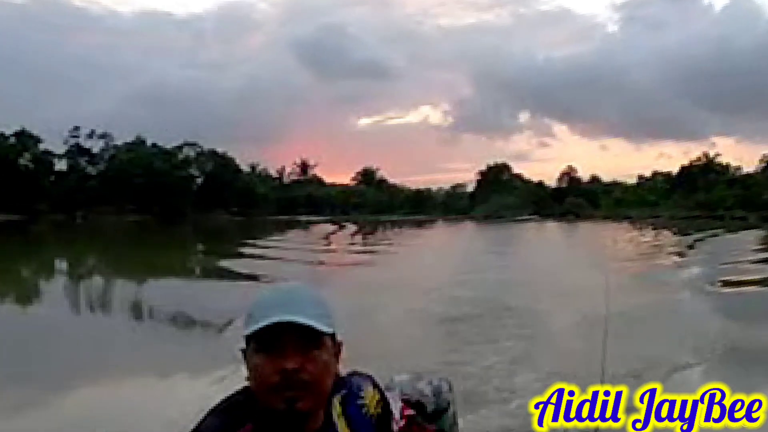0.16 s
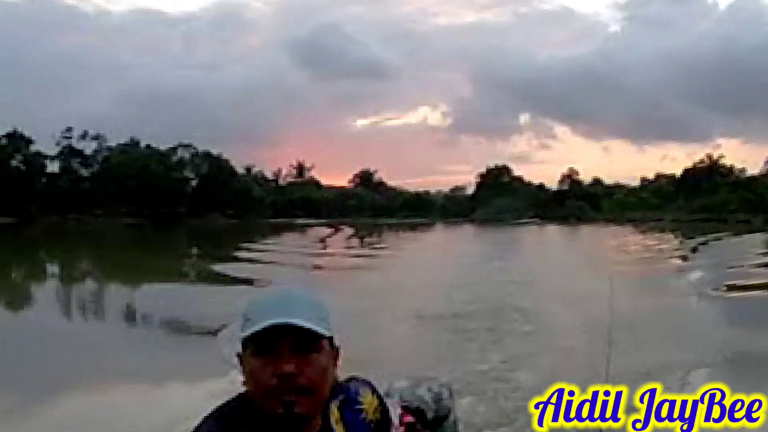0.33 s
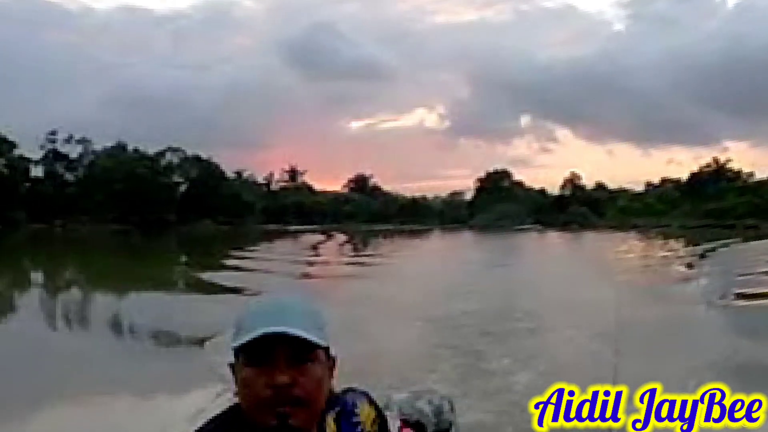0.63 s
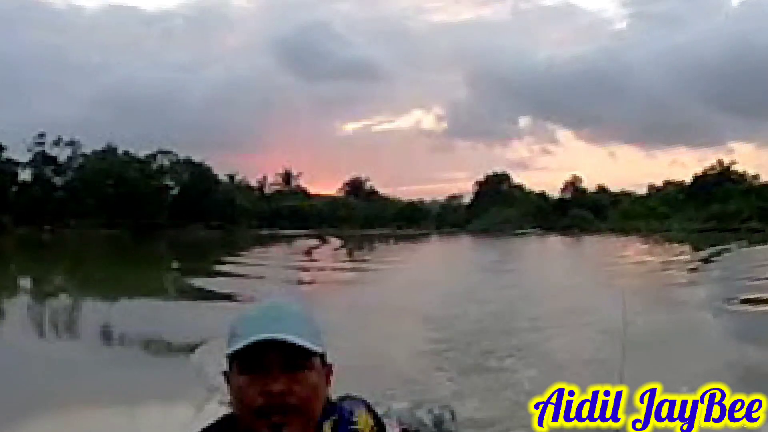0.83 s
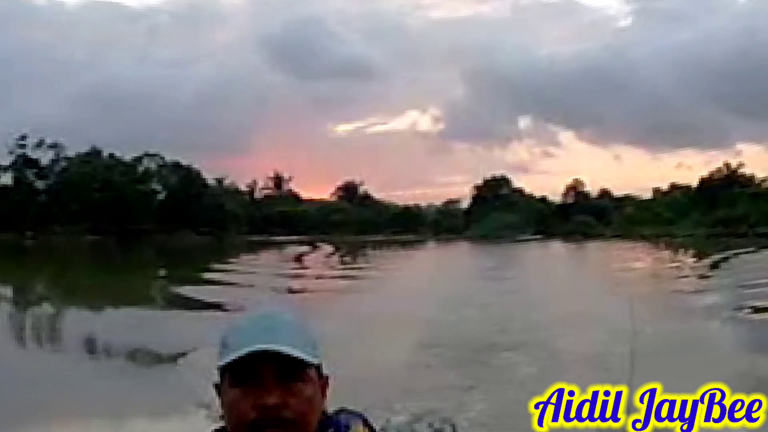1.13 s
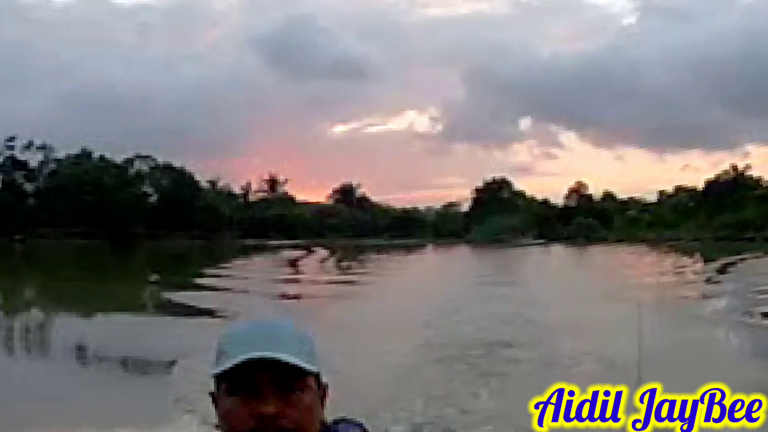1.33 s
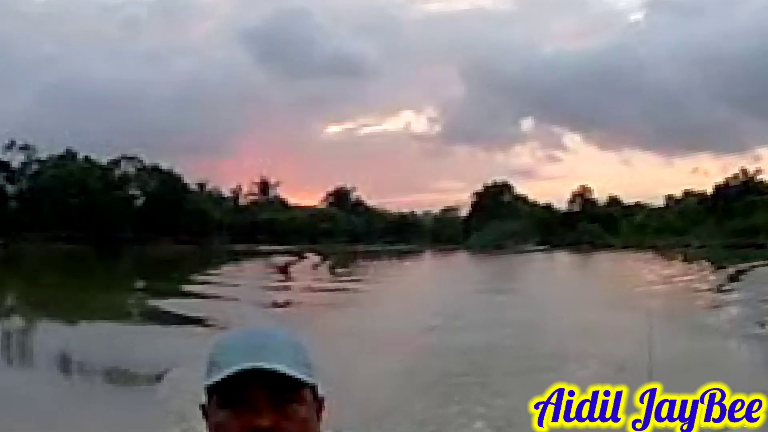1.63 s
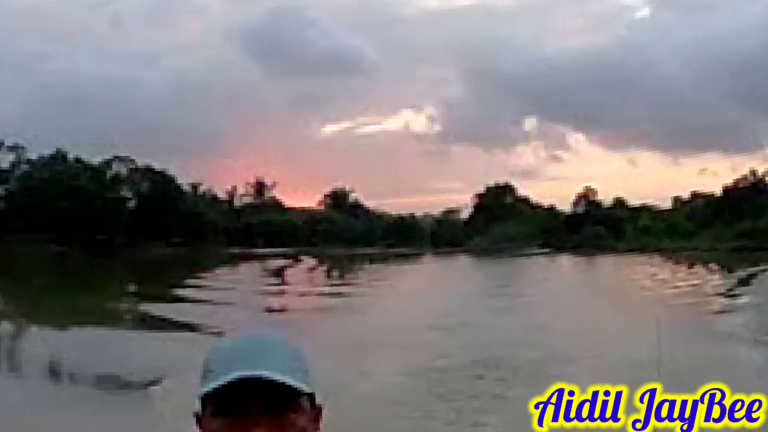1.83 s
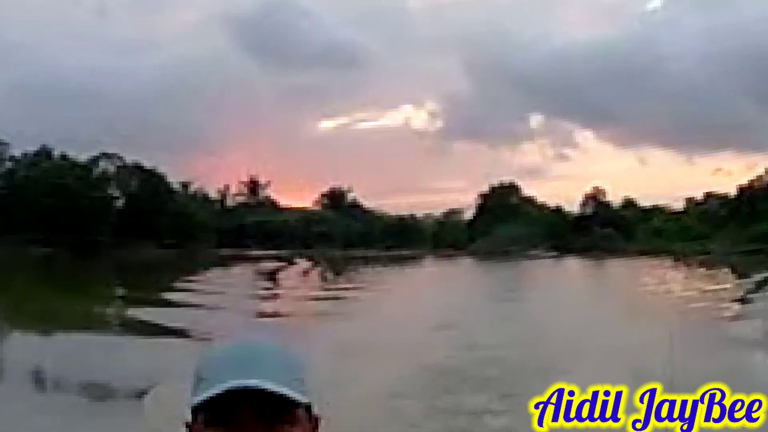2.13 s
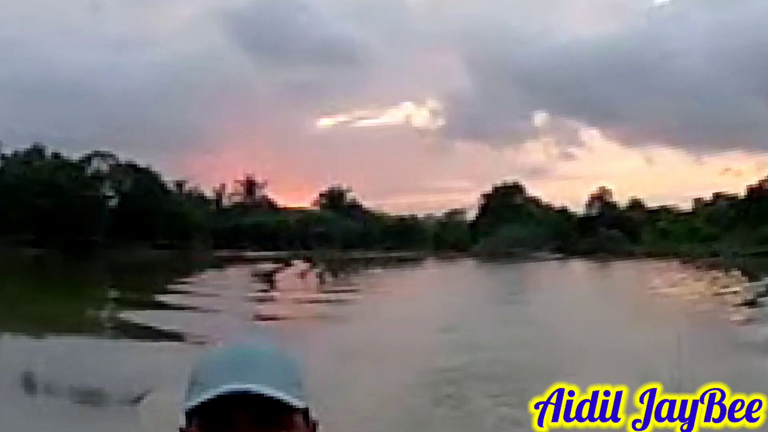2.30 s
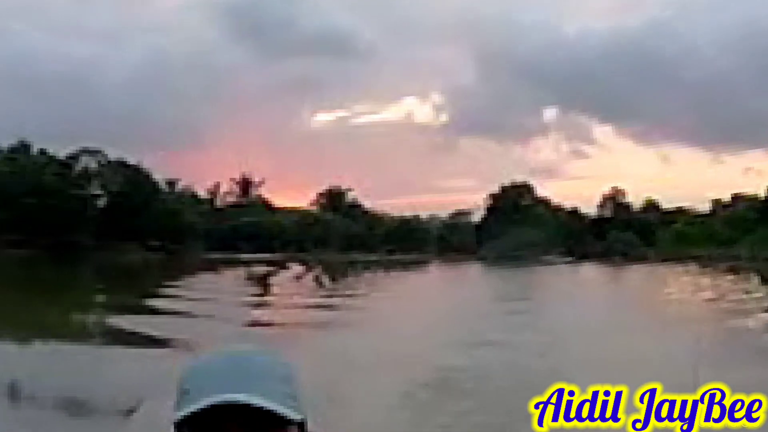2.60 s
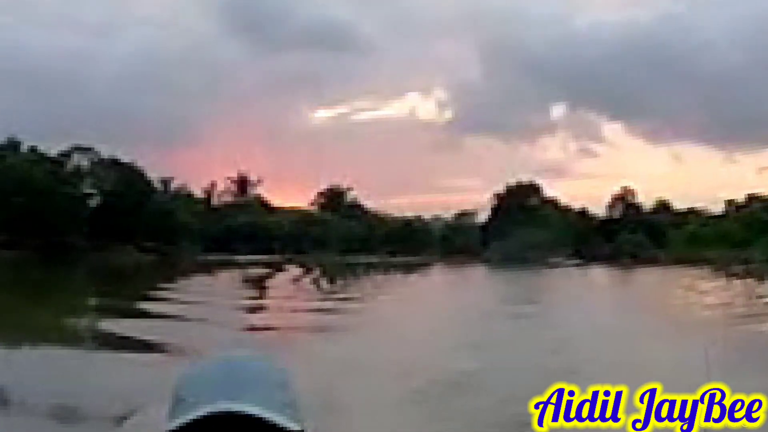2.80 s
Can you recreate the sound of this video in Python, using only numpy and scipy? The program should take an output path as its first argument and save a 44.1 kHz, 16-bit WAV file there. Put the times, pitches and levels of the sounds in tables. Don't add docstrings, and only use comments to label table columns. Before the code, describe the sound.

Steady buzzing hum of a small boat motor with fizzing spray, ending in heavy hull knocks

```python
import sys
import numpy as np
from scipy import signal
from scipy.fft import rfft, irfft, next_fast_len
from scipy.io import wavfile
from scipy.ndimage import uniform_filter1d, map_coordinates

SR = 44100
rng = np.random.default_rng(int(sys.argv[2]) if len(sys.argv) > 2 else 0)


def int16_out(signal):
    q = np.round(np.clip(np.atleast_2d(signal).T, -1, 1) * 32767)
    wavfile.write(sys.argv[1], SR, q.astype(np.int16))


def attenuation_scalar(level_db):
    decades = np.asarray(level_db, float) / 20
    return 10 ** decades


N = 130095

# f/Hz, level/dB
RUMBLE_COLOUR = [(30, -4), (60, -14.5), (85, -16.5), (160, 0.5), (300, -7.5), (400, -10), (650, -7.5),
                 (1100, -42.5)]
# t/s, level/dB
WAVE_CHURN = [
    (2.69, -60),
    (2.73, -31),
    (2.8, -27),
    (2.86, -32),
    (2.89, -25),
    (2.95, -21),
]
# f/Hz, level/dB
CHURN_COLOUR = [(25, -16), (60, -4), (130, 6), (250, -2), (400, -3), (600, -10), (900, -33)]
# t/s, level/dB, pitch f/Hz, time to fall 60
# dB t60/s
HULL_SLAPS = [(.11, -29, 775, 0.16), (.175, -33, 845, 0.19), (.62, -20, 130, 0.062),
              (1.255, -25.5, 377.4, 0.19), (2.70, -27, 799.6, 0.065), (2.727, -1, 155, 0.031),
              (2.752, -14, 110, 0.056), (2.762, -9.5, 288, 0.031), (2.791, -10, 202.6, 0.057),
              (2.805, -19, 236, 0.034), (2.879, -17, 140.3, 0.043), (2.893, -5.5, 139.6, 0.045),
              (2.9, -10.5, 338, 0.045), (2.913, -10, 150, 0.0548), (2.931, -6.5, 161, 0.036),
              (2.939, -7, 270, 0.028), (2.9456, -3.5, 389, 0.028)]
# t/s, level/dB
SPRAY_LEVEL = [(0.0, -41), (0.01, -42), (0.06, -36.5), (0.15, -40), (0.65, -40.5), (0.72, -36.5),
               (0.91, -41), (1.08, -37.5), (1.08, -40), (2.48, -39.5), (2.53, -38), (2.95, -38.5)]
# f/Hz, level/dB
FIZZ_COLOUR = [(4000, -7.5), (5400, -6), (6500, 0), (8000, -7), (9100, -4.5), (11000, -16.5), (13700, -29),
               (15000, -16)]
# f/Hz, level/dB
MIST_COLOUR = [(10500, -20), (12000, -8), (13700, -8), (15000, -4)]
# t/s, peak level/dB
SPLASHES = [(0.0656, -23), (0.5406, -20), (0.711, -32), (1.065, -21), (1.4541, -20), (1.8495, -31),
            (2.1303, -22), (2.5641, -13.5), (2.6327, -19), (2.7152, -25), (2.7312, -15), (2.9297, -21)]
# f/Hz, level/dB
SPLASH_COLOUR = [(4500, -11), (6500, -4), (9500, -2), (11500, -12), (13500, -19), (15000, -8)]
# t/s, gear whine f/Hz, whine level/dB, hum level over its mean/dB
ENGINE = [(0.0, 598, -40, -5), (0.02, 595.5, -28, 4), (0.04, 599.0, -40, -1.5), (0.06, 602.5, -30.5, 0.5),
          (0.48, 605, -27, -1.5), (0.61, 604.4, -31, 0), (1.0, 600.8, -24.5, -1), (1.02, 607.3, -29.5, -1),
          (1.12, 604.2, -27.5, 0), (1.87, 602.7, -29.5, 0), (2.14, 607, -25.5, 0), (2.15, 607, -28.5, 0),
          (2.95, 596.8, -26, 0.5)]
HUM_ORDERS = [2, 3, 4, 5, 6, 7, 8, 8.5, 9, 10, 12, 16, 18, 19, 20]
HUM_LEVELS = [-1.5, -23, 1, -10, -25, -31, -12.5, -22.5, -18, -26, -20, -23.5, -25.5, -29.5, -31]
WHINE_ORDERS = [12.5, 13, 13.5, 26, 28, 37, 39, 40.5, 41, 43, 52, 88, 98]
WHINE_LEVELS = [-16, 0, -20.5, -25.5, -28, -28.5, -24.5, -21.5, -33.5, -29.5, -32, -32, -30]
# f/Hz, level/dB
CASING_COLOUR = [(500, -42), (750, 0), (1100, -3), (1400, -4.5), (1900, -5.5), (2400, -10), (3500, -12.5),
                 (5200, -13.5)]


def unit(x):
    return x / np.sqrt(np.mean(x ** 2) + 1e-20)


def curves(rows):
    times, *columns = np.transpose(rows)
    return [np.interp(np.arange(N) / SR, times, column) for column in columns]


def wobble(rate):
    return map_coordinates(rng.standard_normal(400), [np.arange(N) * rate / SR])


def coloured(x, points):
    size = next_fast_len(N + 8192)
    f, db = np.transpose(points)
    log_f = np.log(f)
    log_hz = np.log(np.fft.rfftfreq(size, 1 / SR) + 1)
    below = np.maximum(log_f[0] - log_hz, 0)
    above = np.maximum(log_hz - log_f[-1], 0)
    gain = attenuation_scalar(np.interp(log_hz, log_f, db) - 40 * (below + above))
    return irfft(rfft(x, size) * gain, size)[:N]


def patchy(patchy_db):
    z = signal.stft(rng.standard_normal(N), nperseg=512)[2]
    patches = uniform_filter1d(rng.standard_normal(z.shape), size=5, axis=0)
    patches = uniform_filter1d(patches, size=3, axis=1)
    return signal.istft(z * attenuation_scalar(patchy_db * unit(patches)), nperseg=512)[1][:N]


def bursts(seconds, gains, t60):
    at = np.clip((seconds * SR).astype(int), 0, N - 1)
    spikes = np.bincount(at, gains, N)
    fade = attenuation_scalar(-60 * np.arange(800) / SR / t60)
    return np.convolve(spikes, fade)[:N] * np.sign(rng.standard_normal(N))


def hull_rumble():
    return attenuation_scalar(-30.5 + 1.6 * wobble(7.61)) * unit(coloured(patchy(patchy_db=1.5), RUMBLE_COLOUR))


def wave_churn():
    level_db = curves(WAVE_CHURN)[0] + 1.8 * wobble(90)
    return attenuation_scalar(level_db) * unit(coloured(rng.standard_normal(N), CHURN_COLOUR))


def hull_slaps():
    rise_s, overtone, overtone_db = 0.0018, 2.197, -13.5
    out = np.zeros(N)
    for s, db, hz, t60 in HULL_SLAPS:
        t = np.maximum(np.arange(N) / SR - s, 0)
        strength = 1.55 * attenuation_scalar(db - 60 * t / t60) * (1 - np.exp(-t / rise_s))
        ring = np.sin(2 * np.pi * hz * t)
        ring = ring + attenuation_scalar(overtone_db) * np.sin(2 * np.pi * overtone * hz * t)
        out = out + strength * ring
    return out


def drops(per_s, mid_hz, octaves, cycles, size):
    spread_db = 2.5
    draw = rng.random((3000, 3))[:int(per_s * N / SR)]
    scatter = rng.standard_normal(3000)[:len(draw), None]
    hz = np.clip(mid_hz * 2 ** (octaves * scatter), 500, 15000)
    t = np.arange(size) / SR
    life = t * hz / cycles
    gain = attenuation_scalar(np.minimum(-spread_db * np.log(draw[:, 1:2] + 1e-6), 11))
    swell = life * np.exp(-3 * life)
    tone = np.sin(2 * np.pi * hz * t * (1 + 0.039 * life))
    grains = gain * swell * tone * np.cos(np.pi / 2 * t / t[-1])
    at = (draw[:, :1] * N).astype(int) + np.arange(size)
    return unit(np.bincount(at.ravel(), grains.ravel(), N + size)[:N])


def gurgle():
    return attenuation_scalar(-49) * drops(per_s=130, mid_hz=1399, octaves=0.7, cycles=26.8, size=1600)


def spray():
    fizz = unit(coloured(patchy(patchy_db=1.9), FIZZ_COLOUR)) * attenuation_scalar(0.7 * wobble(22))
    bubbles = drops(per_s=450, mid_hz=7416, octaves=0.67, cycles=26, size=400)
    bubbles = unit(coloured(bubbles, [(2000, -17), (3500, -10)] + FIZZ_COLOUR[1:]))
    mist = attenuation_scalar(-19 + 2.6 * wobble(14)) * unit(coloured(patchy(patchy_db=8.0), MIST_COLOUR))
    strength_db, = curves(SPRAY_LEVEL)
    return attenuation_scalar(strength_db - 1.0) * (fizz + attenuation_scalar(-12.5) * bubbles + mist)


def splashes():
    s, db = np.transpose(SPLASHES)
    lag_s = 0.001
    return coloured(bursts(s + lag_s, attenuation_scalar(db), t60=0.006), SPLASH_COLOUR)


def orders(turns, multiples, levels_db):
    out = np.zeros(N)
    for k, db in zip(multiples, levels_db):
        lean = 0.41
        if k > 5:
            lean += 0.5
        if k > 8:
            lean += rng.random()
        shake_db = (1.27 - 0.1384 * db) * 1.17 * np.tanh(wobble(20) / 1.5)
        out = out + np.sqrt(2) * attenuation_scalar(db + shake_db) * np.cos(2 * np.pi * (k * turns + lean))
    return out


def casing_noise(turns):
    gate = 1 + 0.095 * np.cos(4 * np.pi * turns)
    noise = unit(coloured(gate * patchy(patchy_db=1.5), CASING_COLOUR))
    return attenuation_scalar(-34.5 + 0.7 * wobble(6)) * noise


def clatter(turns):
    firing = np.flatnonzero(np.diff(np.floor(2 * turns)) > 0)
    weak_cylinder_db = -6
    size_db = weak_cylinder_db * (np.arange(len(firing)) % 2)
    rattle = bursts(firing / SR, attenuation_scalar(size_db), t60=0.0047 * 3)
    rattle = unit(coloured(rattle, CASING_COLOUR[-3:] + FIZZ_COLOUR[2:]))
    return attenuation_scalar(np.mean(curves(SPRAY_LEVEL)[0]) - 7.5) * rattle


def motor():
    gear_teeth, start_turns, jitter_turns = 13, 0.64, 0.007
    whine_hz, whine_db, load_db = curves(ENGINE)
    turns = np.cumsum(whine_hz / gear_teeth) / SR + start_turns + jitter_turns * wobble(9)
    hum = attenuation_scalar(-23.5 + load_db) * orders(turns, HUM_ORDERS, HUM_LEVELS)
    whine = attenuation_scalar(whine_db) * orders(turns, WHINE_ORDERS, WHINE_LEVELS)
    return hum + whine + casing_noise(turns) + clatter(turns)


def scene():
    hull = hull_rumble() + wave_churn() + hull_slaps()
    water = gurgle() + spray() + splashes()
    return (hull + water + motor())[None]


def low_pass(x):
    return signal.sosfilt(signal.butter(12, 16850, fs=SR, output="sos"), x)


def record(dry):
    ceiling, low_cut_hz, top_hz = 0.9, 50, 15500
    soft = dry / (1 + np.abs(dry / ceiling) ** 4) ** 0.25
    size = next_fast_len(N + 8192)
    hz = np.fft.rfftfreq(size, 1 / SR)
    passed = (hz < top_hz) * hz ** 4 / (low_cut_hz ** 4 + hz ** 4)
    mix = irfft(rfft(soft, size) * passed, size)[:, :N]
    return low_pass(mix)


dry = scene()
out = record(dry)
int16_out(out)
```